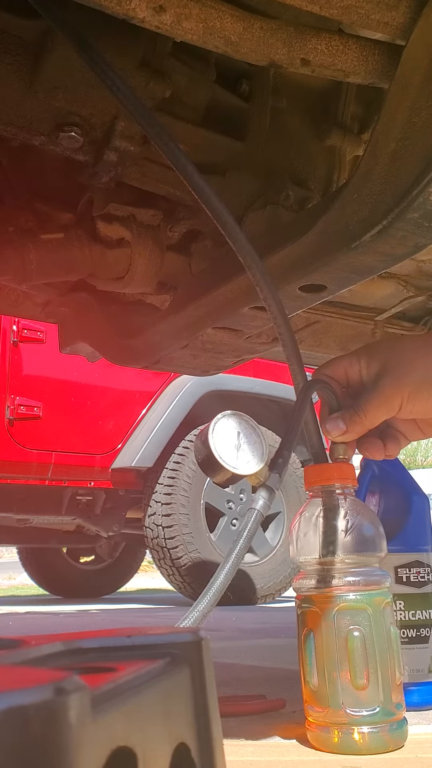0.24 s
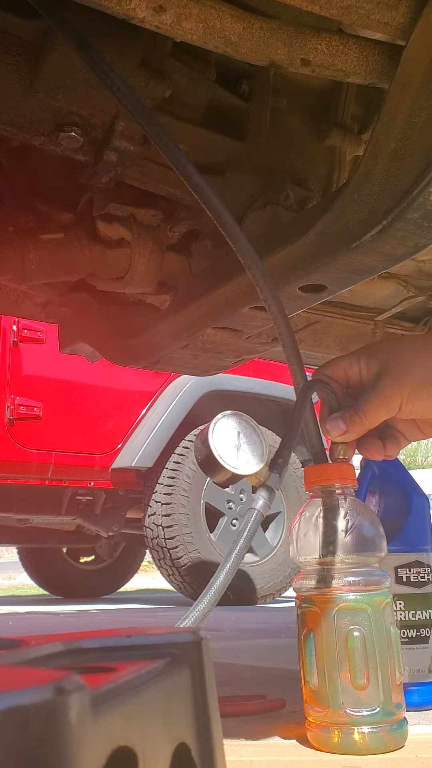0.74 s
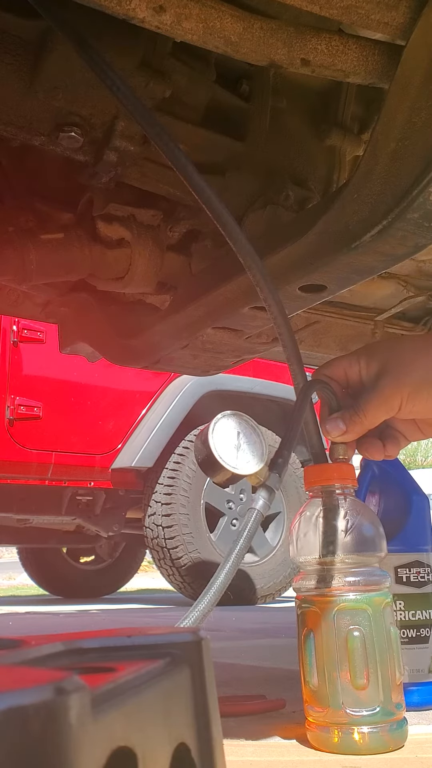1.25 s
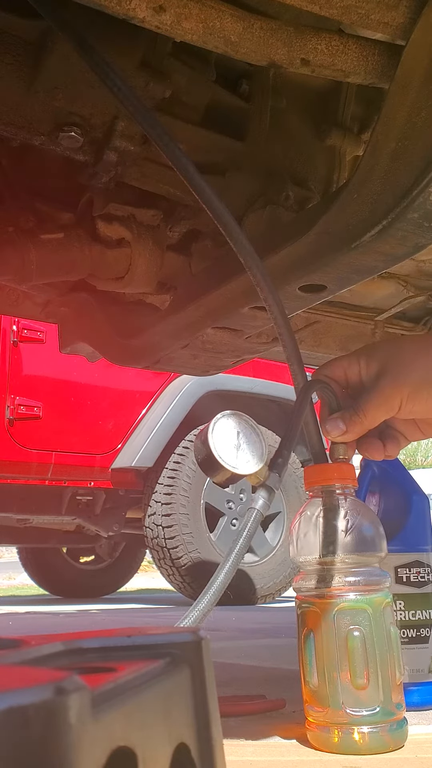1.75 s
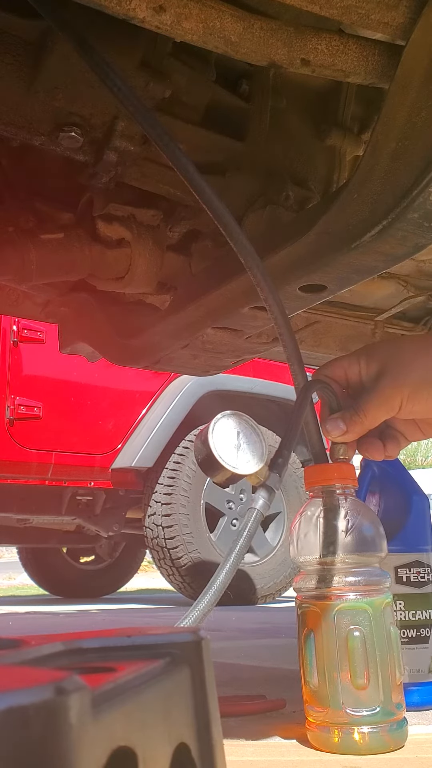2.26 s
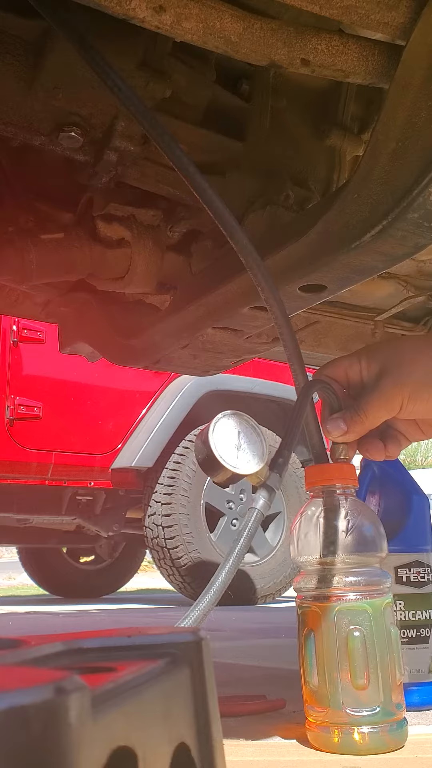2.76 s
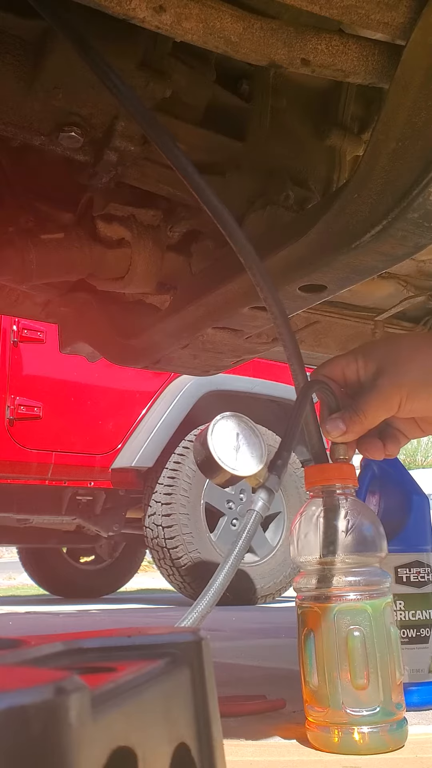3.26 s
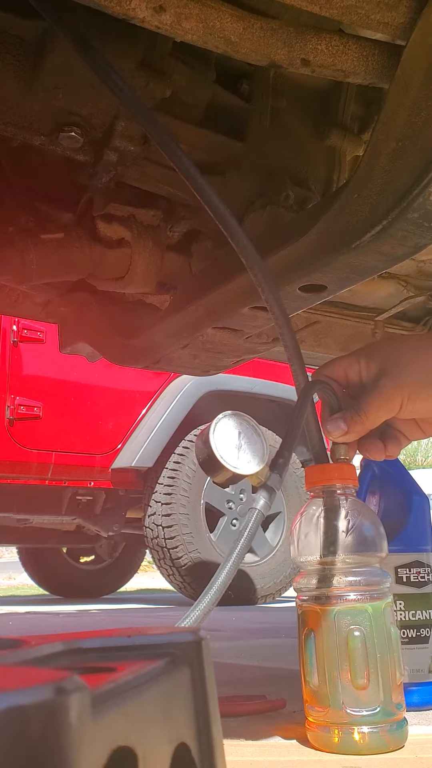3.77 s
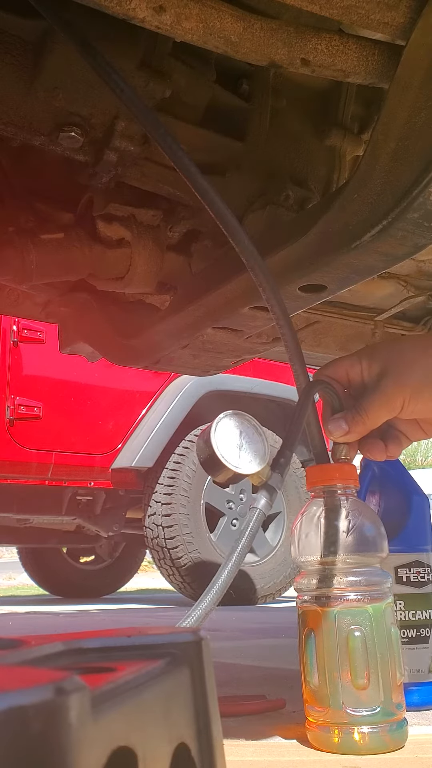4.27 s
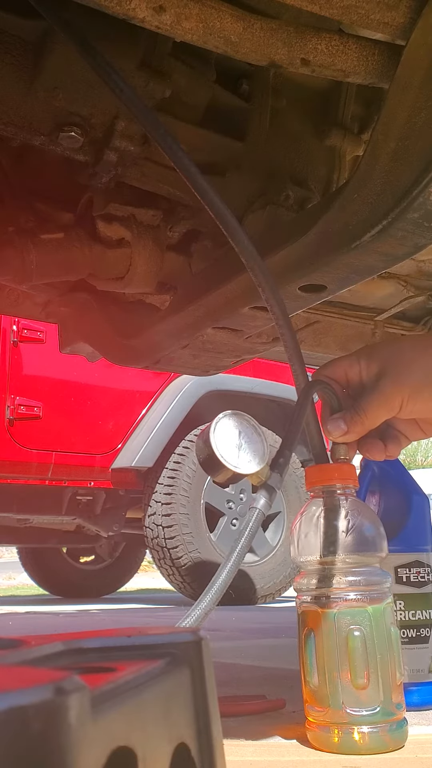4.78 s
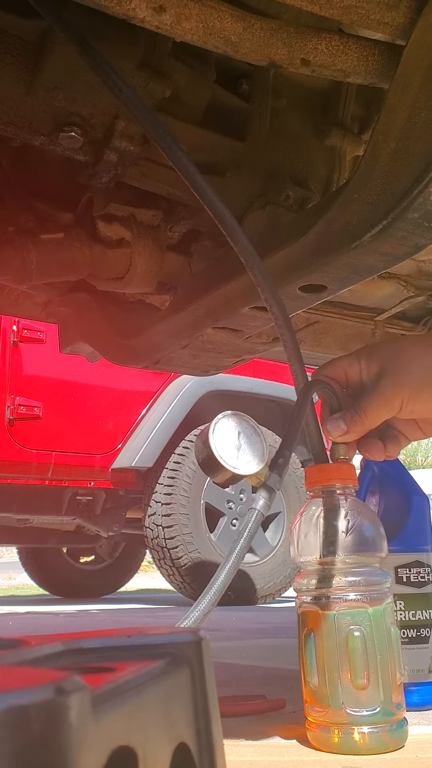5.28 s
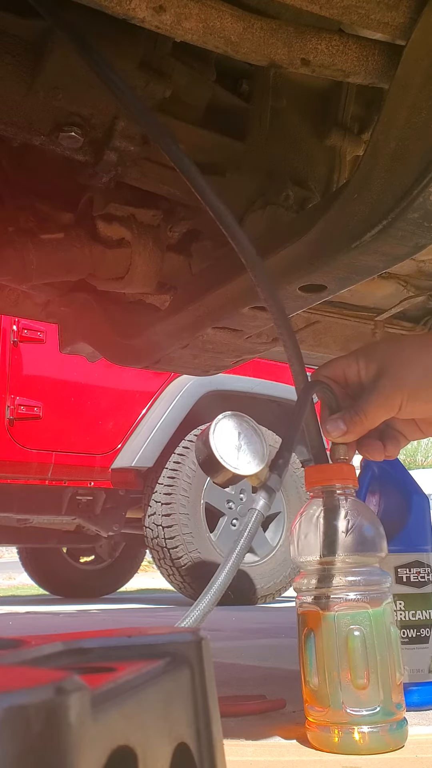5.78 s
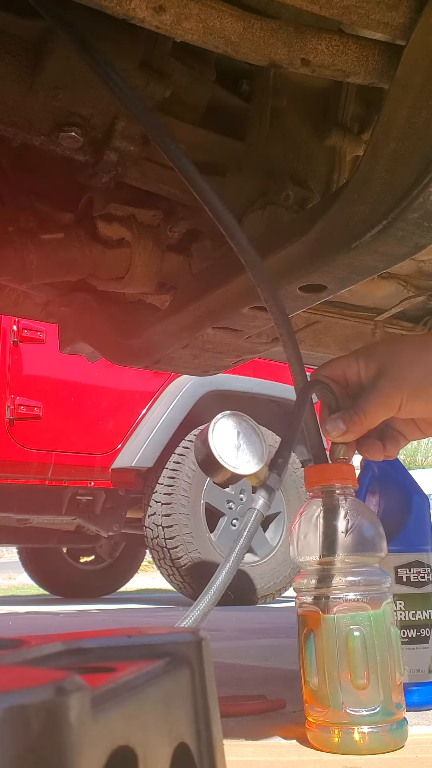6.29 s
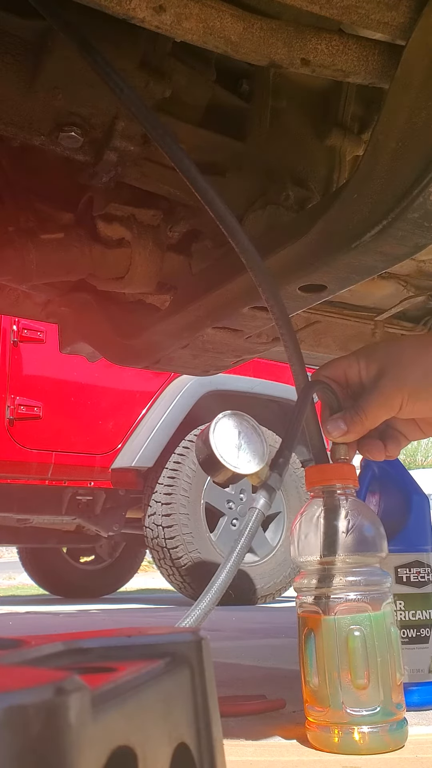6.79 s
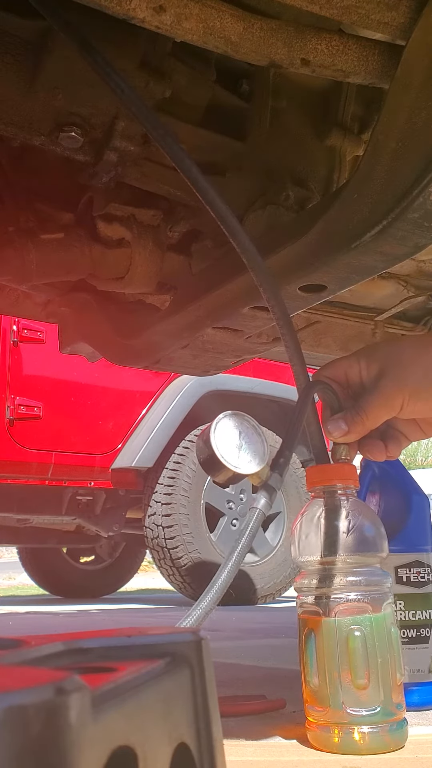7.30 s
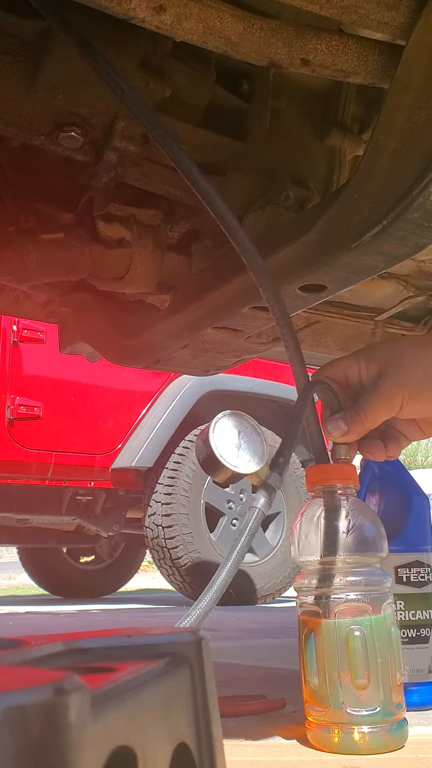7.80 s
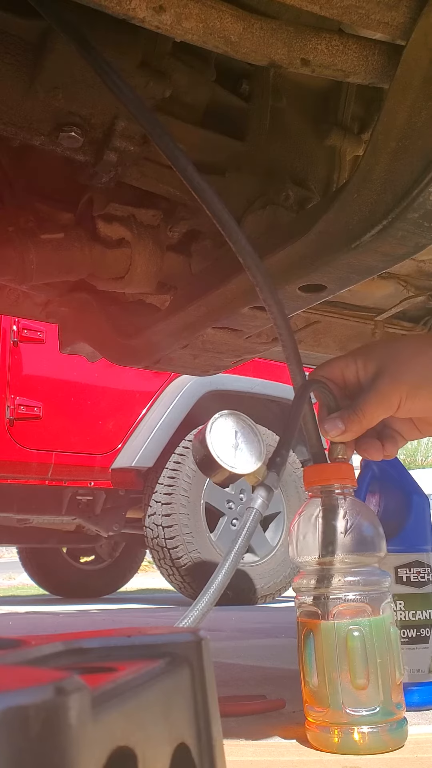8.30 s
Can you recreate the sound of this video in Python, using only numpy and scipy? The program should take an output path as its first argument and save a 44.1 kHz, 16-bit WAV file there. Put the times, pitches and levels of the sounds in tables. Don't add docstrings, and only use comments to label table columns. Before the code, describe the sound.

A small piston air compressor runs nonstop, a loud harsh buzzing drone with gear whine, reedy flutter and plastic rattle, close by in a garage.

```python
import sys
import numpy as np
from scipy import signal
from scipy.fft import rfft, irfft
from scipy.io import wavfile

SR = 44100
rng = np.random.default_rng(int(sys.argv[2]) if len(sys.argv) > 2 else 0)


def gain_from_db(level_db):
    decades = np.asarray(level_db, float) / 20
    return 10 ** decades


def generate_wav(sig):
    pcm = np.round(np.clip(np.atleast_2d(sig).T, -1, 1) * 32767).astype(np.int16)
    wavfile.write(sys.argv[1], SR, pcm)


N = 376613
CRANK_TEETH, PINION_TEETH = 53, 12


def in_time(rows):
    time_s, value = np.transpose(rows)
    return np.interp(np.arange(N) / SR, time_s, value)


def at_hz(points, hz):
    point_hz, value = np.transpose(points)
    return np.interp(np.log(hz), np.log(point_hz), value)


def pair(x, left_db):
    return x * gain_from_db(np.array([[left_db], [0]]))


def alike_pair(right, own, alike):
    alike = np.clip(alike, 0, 1)
    return np.array([alike * right + np.sqrt(1 - alike ** 2) * own, right])


def resonate(x, hz, width_hz):
    r = np.exp(-np.pi * width_hz / SR)
    zeros = [(1 - r * r) / 2, 0, (r * r - 1) / 2]
    poles = [1, -2 * r * np.cos(2 * np.pi * hz / SR), r * r]
    return signal.sosfilt([zeros + poles] * 2, x)


def per_turn(turn, spread):
    count = int(turn[-1]) + 2
    return spread * np.interp(turn, np.arange(count), rng.standard_normal(count))


def thump_phase(k):
    if k < 9:
        return -2.4 + .6 * (-1) ** k - 2 * max(5.2 - k, 0)
    return 2.1 + .12 * (k - 12) - .85 * (k % 2)


# crank_multiple, right_db (rms), left_minus_right_db
AIR_PULSES = [(1, -54, -1), (2, -57, -4), (3, -44, -2), (4, -35, -3), (5, -37, -1), (6, -34, -1),
              (7, -32, 0), (8, -56, -3), (9, -52, -1), (10, -40, -2), (11, -40, -1), (12, -31, 0),
              (13, -39, 2), (14, -40, -2), (15, -37, -11), (16, -55, 5), (17, -48, -1), (18, -48, -6),
              (19, -37, -4)]
# crank_multiple, motor_multiple, right_db (rms), left_minus_right_db
MOTOR_HUM = [(0, 1, -41, -0.5), (0, 2, -61, -11), (0, 3, -53, 0), (0, 4, -59.5, 7), (4, 1, -47.5, 0),
             (6, 1, -48, 2), (8, 1, -45, -4.5), (12, -1, -55, 1), (16, -1, -52, 2), (0, 10, -41, -9),
             (0, 16, -38, -13), (0, 30, -53, 3)]


def thump(turn):
    motor_turn = turn * CRANK_TEETH / PINION_TEETH
    out = 0
    for k, db, left_db in AIR_PULSES:
        out = out + pair(gain_from_db(db) * np.cos(2 * np.pi * k * turn + thump_phase(k)), left_db)
    for k, m, db, left_db in MOTOR_HUM:
        cycles = round(k) * turn + round(m) * motor_turn
        out = out + pair(gain_from_db(db) * np.cos(2 * np.pi * cycles), left_db)
    return np.sqrt(2) * out


# pitch_hz, width_hz, right_db_per_hz, left_minus_right_db,
# hardest_turn, swing_db
MACHINE_MODES = [(567, 205, -59.5, -9.5, 1, -0.5), (1015, 167, -52.5, -2.5, 0.6, -8.5),
                 (1239, 200, -52, -30, 0.84, -20.5), (1747, 206, -48, -11, 0.21, 5.5),
                 (2070, 277, -49, -12.5, 0.78, -14), (2325, 115, -48, -5, 0.31, -2),
                 (2694, 174, -53, 0, 1, -11), (2910, 464, -49.5, -21, 0.33, 10.5),
                 (3240, 280, -51.5, -4.5, 0.59, 9), (3750, 780, -63, -5.5, 0.94, 4),
                 (4213, 400, -57, -6.5, 0.42, 5.5),
                 (4843, 420, -52, -4.5, 0.36, 6.5), (5303, 590, -50, -9.5, 0.77, -2.5),
                  (5830, 84, -51, -21, 0.96, -10), (6414, 640, -53, -13.5, 0.5, 9),
                  (7160, 1200, -58.5, -28, 0.795, -5.5), (8270, 2100, -68, -3, 0.3, 11),
                  (11000, 1040, -68.5, -5.5, 0.52, 11), (11720, 1330, -63, -8.5, 0.29, 12),
                  (13900, 1200, -72.5, 6, 0.5, 18), (15870, 1700, -66, 5.5, .37, -3)]
# crank_turn, level_db
TOOTH_LOAD = [(0, 6.5), (.1, 0), (.26, -4), (.33, 2), (.46, 1.5), (.6, 3.5), (.76, 4.5), (.86, 8.5),
              (1, -8.5)]
# pitch_hz, level_db
TOOTH_WEAR = [(500, -14), (1000, -6), (1300, -16), (1750, -3), (2100, -9), (2300, -8), (2620, -14),
              (3000, -7), (3400, -7), (4200, -12), (5300, -9), (7000, -20)]
# pitch_hz, share_0_to_1
STEREO_LIKENESS = [(60, .85), (200, .95), (1000, .88), (1800, .8), (2300, .4), (3500, .3), (4600, .55),
                   (5400, .75), (6200, .35), (15000, .2)]


def housing(turn, beat):
    tooth = (turn * CRANK_TEETH).astype(int)
    contact = np.diff(tooth, prepend=0) * np.sqrt(N / tooth[-1])
    pinion = 1 + beat * np.cos(2 * np.pi * tooth / PINION_TEETH)
    load_db = np.interp(turn % 1, *np.transpose(TOOTH_LOAD))
    out = 0
    for hz, width_hz, db, left_db, hardest_turn, swing_db in MACHINE_MODES:
        tooth_error = rng.standard_normal(CRANK_TEETH)
        worn = contact * pinion * tooth_error[tooth % CRANK_TEETH]
        right, own = rng.standard_normal((2, N))
        chance = alike_pair(right, own, at_hz(STEREO_LIKENESS, hz))
        shake = chance + gain_from_db(at_hz(TOOTH_WEAR, hz)) * worn
        peak = np.exp(2 * (np.cos(2 * np.pi * (turn - hardest_turn)) - 1))
        gate = gain_from_db(load_db + swing_db * peak + per_turn(turn, .6))
        gate = gate / np.sqrt(np.mean(gate ** 2))
        out = out + pair(gain_from_db(db), left_db) * resonate(gate * shake, hz, width_hz)
    return np.sqrt(SR / 2) * out


def mesh_whine(turn, loaded_turn):
    stroke = 2 * np.pi * (turn - loaded_turn)
    angle = 2 * np.pi * CRANK_TEETH * turn - .13 * np.sin(stroke) - .2 * np.sin(2 * stroke)
    press = 1 + 1.05 * np.cos(stroke) + .7 * np.cos(2 * stroke + .4)
    tone = press * gain_from_db(per_turn(turn, 1.4)) * np.sin(angle + per_turn(turn, .36))
    return pair(gain_from_db(-22) * tone, -16)


def burst(turn, start, length, multiple, sharp, beat, slip, jitter, spread_db):
    angle = turn + 1 - start
    pinion = 2 * np.pi * angle.astype(int) * CRANK_TEETH / PINION_TEETH
    since = angle % 1 + slip * np.sin(pinion) + per_turn(angle, jitter)
    swell = np.sin(np.pi * np.clip(since / length, 0, 1)) ** sharp * (angle % 1 > slip)
    strength = (1 + beat * np.cos(pinion)) * gain_from_db(per_turn(angle, spread_db))
    return strength * swell * np.sin(2 * np.pi * multiple * since)


def valve_reed(turn):
    flutter = burst(turn, start=.78, length=.31, multiple=26.3, sharp=.8,
                    beat=.08, slip=.0035, jitter=.0006, spread_db=.5)
    return pair(gain_from_db(-7) * resonate(flutter, hz=1177, width_hz=520), -7)


def high_whine(turn):
    squeal = burst(turn, start=.3, length=.58, multiple=108.5, sharp=.5,
                   beat=.2, slip=.0015, jitter=.003, spread_db=1.4)
    return pair(gain_from_db(-18) * squeal, -7)


# pitch_hz, level_db_per_hz
RUMBLE_FLOOR = [(25, -92), (40, -84), (55, -69), (120, -70), (250, -65), (420, -60.5), (800, -62.5),
                (1500, -53), (3000, -60.5), (6000, -60.5), (8000, -82), (10000, -72), (12000, -70.5),
                (16000, -70)]


def rumble():
    hz = np.maximum(np.fft.rfftfreq(N, 1 / SR), 1)
    right, own = rfft(rng.standard_normal((2, N)))
    both = alike_pair(right, own, at_hz(STEREO_LIKENESS, hz))
    return pair(irfft(both * gain_from_db(at_hz(RUMBLE_FLOOR, hz)) * np.sqrt(SR / 2), N), -3.5)


# start_s, level_db
FRICTION = [(0.0, -30.5), (0.07, -30.5), (1.4, -33), (2.8, -32), (4.33, -34.5), (5.68, -31.5),
            (5.76, -33.5), (8.47, -32.5), (8.54, -33)]
# gain_db_per_turn_per_s (of speed sag), friction_share
STRAIN_RESPONSE = [
    (1.5, 0.21),
    (6.5, 0.77),
    (-1, 0.34),
    (5, 3.4),
]


def strain(speed_turns_per_s):
    friction_db = in_time(FRICTION)
    friction_db = friction_db - np.mean(friction_db)
    sag = 49.3 - speed_turns_per_s
    return [gain_from_db(sag_db * sag + share * friction_db) for sag_db, share in STRAIN_RESPONSE]


# start_s, speed_turns_per_s
CRANK_SPEED = [(0.0, 49.431), (0.45, 49.151), (1.56, 49.472), (1.78, 49.223), (2.14, 49.44), (2.84, 49.092),
               (3.33, 49.167), (3.69, 49.083), (3.89, 49.364), (4.61, 49.44), (4.78, 49.3), (5.4, 49.409),
               (5.69, 49.226), (6.24, 49.118), (6.97, 49.455), (7.66, 49.403), (8.3, 49.02), (8.54, 49.06)]
# pitch_hz, lead_rad
LEFT_LEAD = [(0, 0), (400, -.28), (600, -.9), (1200, -2.2), (2000, -2.9), (2500, -5.6), (2800, -6.6),
             (3200, -8.7), (3600, -11.4), (4000, -13.9), (4500, -15.2), (5400, -15.7), (7000, -18.9),
             (16000, -23)]


def scene():
    speed_turns_per_s = in_time(CRANK_SPEED)
    turn = .012 + np.cumsum(speed_turns_per_s) / SR
    rattle, press, flutter, sing = strain(speed_turns_per_s)
    mix = thump(turn) + rattle * housing(turn, beat=.45)
    mix = mix + press * mesh_whine(turn, loaded_turn=.63)
    mix = mix + flutter * valve_reed(turn) + sing * high_whine(turn)
    left, right = mix + rumble()
    lead_rad = np.interp(np.fft.rfftfreq(N, 1 / SR), *np.transpose(LEFT_LEAD))
    return np.array([irfft(rfft(left) * np.exp(1j * lead_rad), N), right])


def top_cut(x):
    return signal.sosfilt(signal.butter(12, 17030, fs=SR, output="sos"), x)


def record(dry):
    notch_hz, notch_width_hz, notch_depth = 10050, 750, .65
    narrow = signal.filtfilt(*signal.iirpeak(notch_hz, notch_hz / notch_width_hz, fs=SR), dry)
    ported = dry - notch_depth * narrow
    rounded = ported / (1 + np.abs(ported / 1.05) ** 5) ** .2
    low_pass = signal.cheby2(24, 60, 15930, fs=SR, output="sos")
    return top_cut(signal.sosfilt(low_pass, rounded))


dry = scene()
out = record(dry)
generate_wav(out)
```